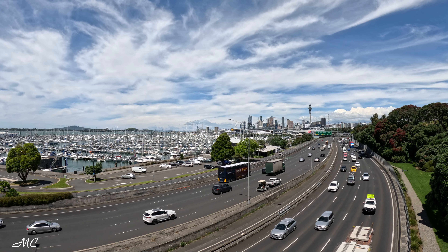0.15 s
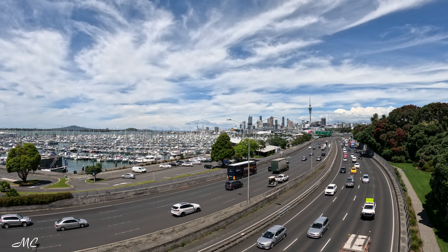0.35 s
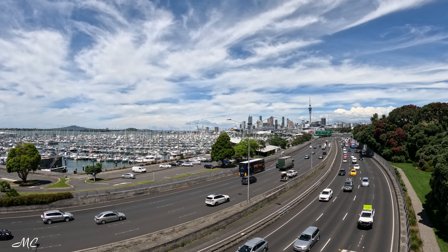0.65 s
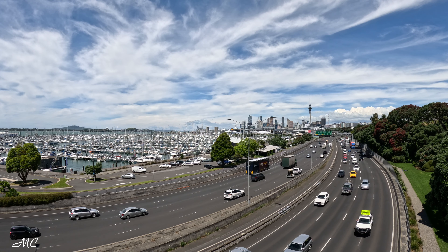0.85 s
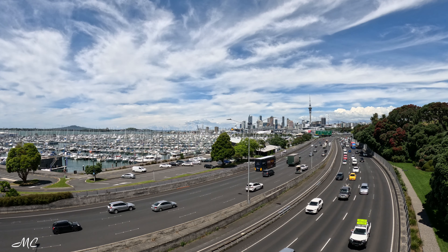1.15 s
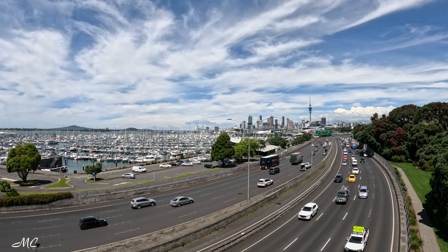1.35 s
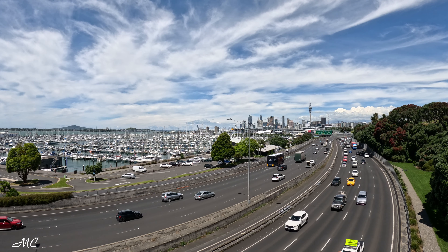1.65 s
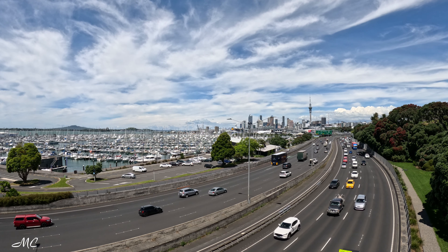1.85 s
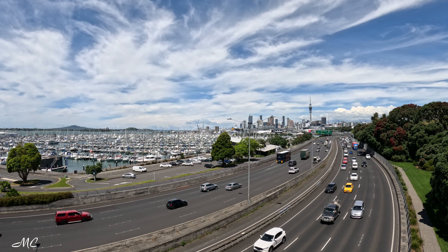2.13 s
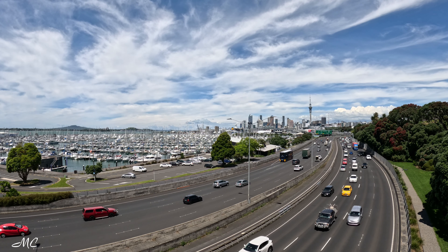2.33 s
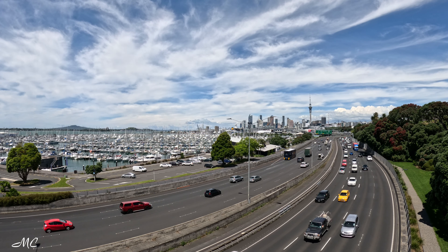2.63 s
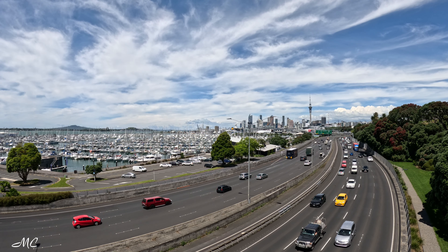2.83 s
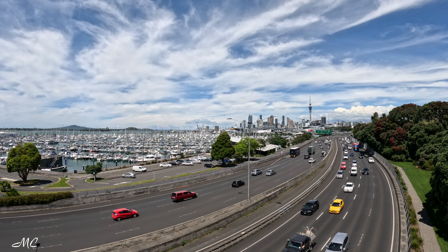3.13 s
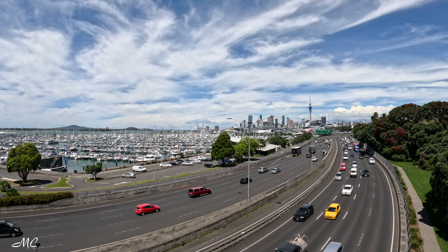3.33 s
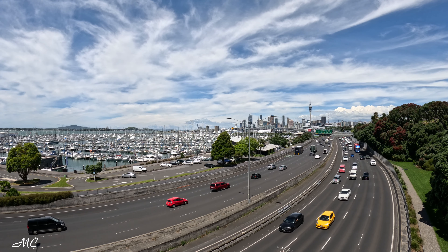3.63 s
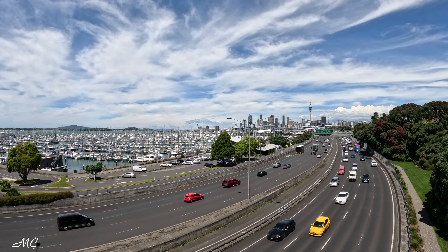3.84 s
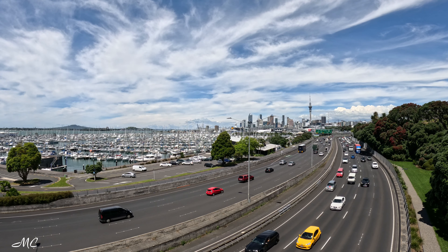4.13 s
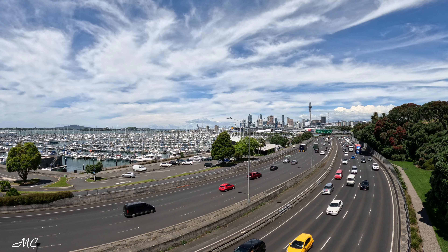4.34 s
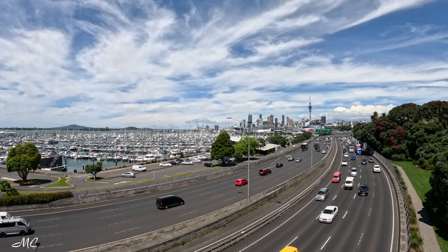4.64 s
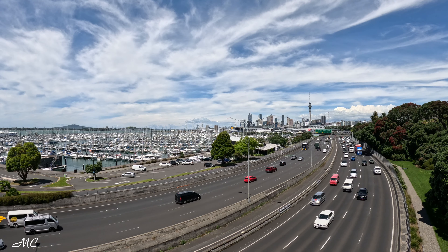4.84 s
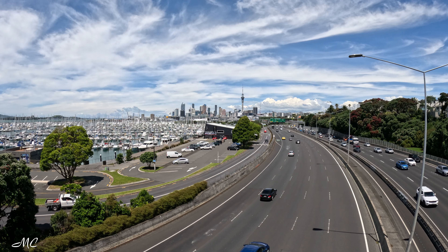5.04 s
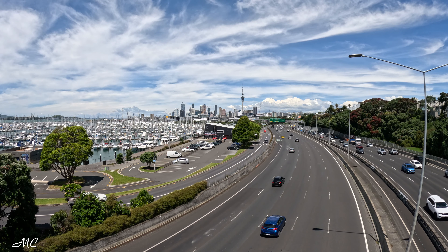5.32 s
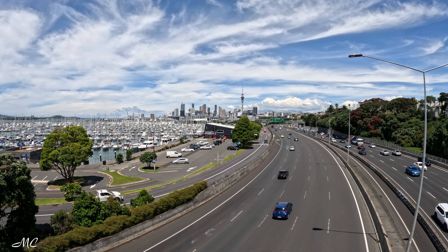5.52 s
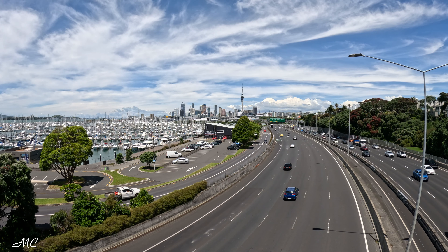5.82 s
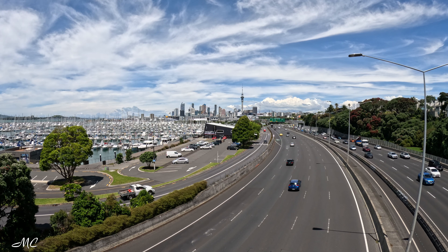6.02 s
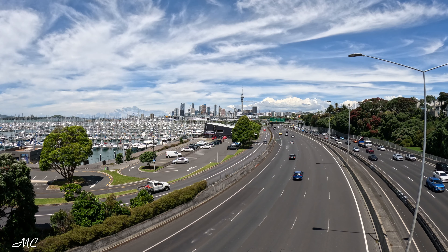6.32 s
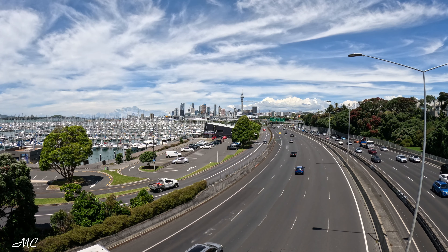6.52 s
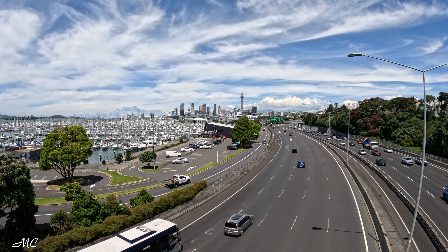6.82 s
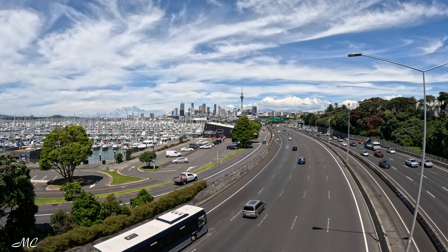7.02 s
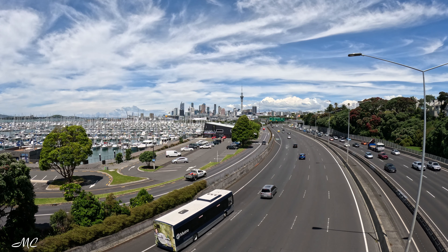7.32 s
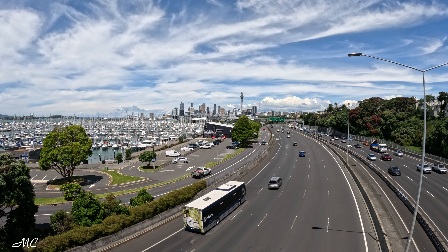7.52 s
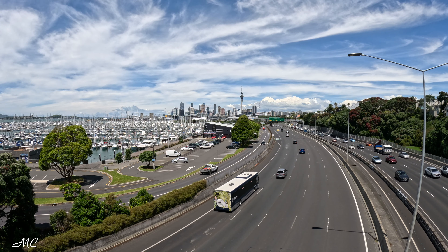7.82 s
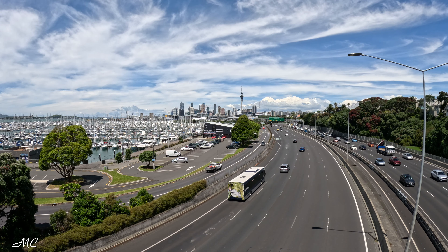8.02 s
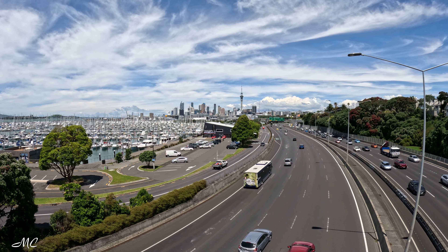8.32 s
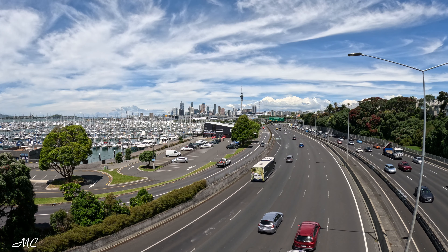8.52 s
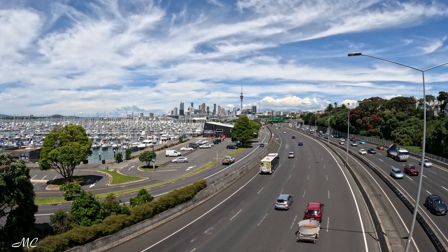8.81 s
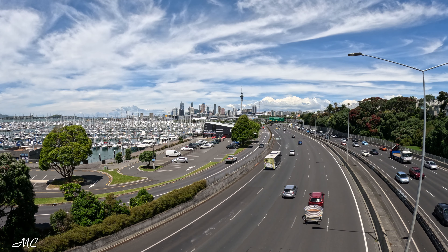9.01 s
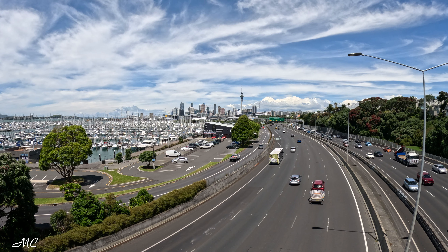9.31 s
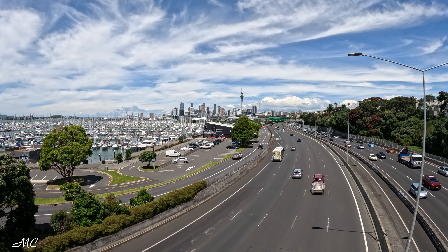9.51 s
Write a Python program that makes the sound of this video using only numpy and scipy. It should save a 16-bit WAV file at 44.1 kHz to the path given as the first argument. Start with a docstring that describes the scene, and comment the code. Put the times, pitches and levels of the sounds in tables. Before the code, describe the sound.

Heard from an overpass, cars and trucks stream along a motorway, their tyres roaring and hissing over engine drones and a deep rumble. About halfway through, the sound cuts out for an instant. Traffic returns quietly and swells as a diesel bus passes underneath with a sinking drone, faint gear whine and air hiss. Near the end, loose steel on a passing trailer clinks and rings, dropping slightly in pitch.

```python
"""Motorway from an overpass.

Heard from one side, then, after a brief silence, from the other. Tyres roar and hiss over engine
drone and low rumble. On the second side a diesel bus pulls away underneath with gear whine and air
hiss; then loose steel clinks on a passing trailer, its ring falling with the Doppler shift."""
import sys
import numpy as np
from scipy import signal
from scipy.fft import rfft, irfft
from scipy.io import wavfile
from scipy.ndimage import uniform_filter1d, map_coordinates

SR = 44100
rng = np.random.default_rng(int(sys.argv[2]) if len(sys.argv) > 2 else 0)


def transcribe(signal):
    """Save signal, clipped to [-1, 1], as a 16-bit WAV file at the path in sys.argv[1]."""
    frames = np.atleast_2d(signal).T
    limited = np.clip(frames, -1, 1)
    pcm = np.round(limited * 32767).astype(np.int16)
    wavfile.write(sys.argv[1], SR, pcm)


N = 426006
TIME = np.arange(N) / SR
CUT_S, RETURN_S = 4.904, 5.06  # silence between the sides
PASS_S = 0.43  # lane distance / vehicle speed


def traffic(wash, passes, road, fizz_re_hiss_db, patch_db, flutter_db):
    """Tyres on asphalt: distant wash plus near vehicles, made patchy by turbulent air."""
    # drone, roar, hiss, fizz: low f/Hz, high f/Hz
    bands = [(110, 380), (450, 1400), (1800, 5000), (6200, 9000)]
    hz, t, spectrum = signal.stft(rng.standard_normal(N), SR, nperseg=1024, noverlap=768)
    shape = colour(road, hz)
    falloff = np.array([1.2, 1.2, 1.3, 1.5])[:, None]  # treble dies away soonest
    power = amp(wash)[:, None] ** 2
    for s, drone_db, roar_db, hiss_db in passes:
        peak = amp([drone_db, roar_db, hiss_db, hiss_db + fizz_re_hiss_db])[:, None] ** 2
        power = power + peak * nearness(s, PASS_S, t) ** falloff
    road_power = np.array([np.sum(shape[(hz >= lo) & (hz < hi)] ** 2) / len(hz) for lo, hi in bands])
    lift_db = 10 * np.log10(power / road_power[:, None])
    centres_hz = [230, 800, 2600, 7500]
    blend = np.array([np.interp(np.log(hz + 1), np.log(centres_hz), row) for row in np.eye(len(bands))])
    patches = uniform_filter1d(rng.standard_normal(spectrum.shape), size=14, axis=0)
    patches = unit(uniform_filter1d(patches, size=16, axis=1))
    flutter = np.sqrt(hz / 5000)[:, None] * unit(uniform_filter1d(rng.standard_normal(len(t)), size=7))
    gain = amp(blend.T @ lift_db + patch_db * patches + flutter_db * flutter)
    return signal.istft(spectrum * shape[:, None] * gain, SR, nperseg=1024, noverlap=768)[1][:N]


def engine(firing_hz, db, orders, waver, fading_db, overtone_fading_db=0.5):
    """Exhaust orders on an unsteady firing rate; each fades as road reflections shift."""
    turns = np.cumsum(firing_hz * (1 + waver * wander(14))) / SR
    note = np.zeros(N)
    for order, order_db in orders:
        depth_db = fading_db if order == 1 else overtone_fading_db
        gain = amp(order_db + depth_db * wander(9.6))
        note += gain * np.sin(2 * np.pi * (order * turns + rng.random()))
    return np.sqrt(2) * note * amp(db)


def passing_engines(rows, fade_s=0.1):
    """Each engine emerges, drones on a gliding pitch and vanishes."""
    # firing order, level/dB
    exhaust = [(1, -7), (2, -23), (3, -37.5)]
    out = np.zeros(N)
    for start_s, end_s, first_hz, last_hz, first_db, last_db in rows:
        hz, db = curves([(start_s, first_hz, first_db), (end_s, last_hz, last_db)])
        gate = np.clip(.5 + np.minimum(TIME - start_s, end_s - TIME) / fade_s, 0, 1)
        out += gate * engine(hz, db, exhaust, waver=0.0048, fading_db=2.0)
    return out


def bus_diesel():
    """Exhaust drone of the bus, surging in level as its pitch sinks."""
    # t/s, firing rate/Hz, level/dB
    run = [(5.3, 90.3, -46.5), (6.05, 88, -34), (6.34, 86.6, -25.5), (6.51, 86.27, -34.5),
           (7.02, 83.94, -23), (7.47, 81.3, -38.5), (7.76, 81.1, -22), (7.95, 80.3, -21),
           (9.17, 80.25, -26.5), (9.29, 80.04, -20), (9.54, 81.2, -30.5), (9.66, 79.8, -43)]
    # firing order, level/dB
    orders = [(1, 0.5), (2, -17.5), (3, -18), (3.5, -21.5)]
    return engine(*curves(run), orders, waver=0.0068, fading_db=1.5)


def trailer(nearest_s=8.24, near_s=0.38, shift=0.04, listed_pitch_s=9.06):
    """Loose steel rings at each blow until it falls back and is damped; Doppler bends its pitch."""
    # f/Hz at listed_pitch_s, level/dB, t60/s, group (0 main ring, 1 second, 2 ping, 3 jangle, 4 chink)
    modes = [(3050, -6, .2, 3), (3605, 0, .18, 4), (3765, 3, .14, 3), (4175, -5, .09, 3),
             (5385, -13, .07, 0), (5453, -2.5, .58, 0), (5530, -10, .07, 0), (5990, -21, .2, 2),
             (7125, -1.5, .075, 1), (7100, -21, .6, 1), (9170, 1, .075, 2), (9165, -22, .5, 2),
             (9200, -10, .08, 3), (9110, -19, .3, 4), (11570, -10.5, .28, 3), (11960, -11.5, .26, 3),
             (12430, -29, .3, 2)]
    # blows: t/s, strength/dB, free ringing/s, contact kind
    clinks = [(7.63, -53, .12, "tap"), (7.86, -54, .1, "tap"), (7.992, -51, .1, "tap"),
              (8.129, -48, .03, "strike"), (8.146, -39, .05, "chink"), (8.166, -44, .06, "tap"),
              (8.183, -56, .02, "jangle"), (8.243, -44.5, .08, "tap"), (8.358, -50, .02, "edge"),
              (8.370, -39, .02, "edge"), (8.381, -27.5, .17, "edge"), (8.386, -32, .022, "strike"),
              (8.401, -39, .02, "knock"), (8.419, -44, .1, "jangle"), (8.426, -37, .005, "tap"),
              (8.451, -30, .014, "tap"), (8.480, -42, .03, "tap"), (8.531, -37, .012, "tap"),
              (8.563, -42, .08, "tap"), (8.598, -42, .04, "tap"), (8.623, -36, .02, "knock"),
              (8.735, -43, .005, "knock"), (8.749, -38.5, .014, "edge"), (8.757, -52, .008, "strike"),
              (8.760, -45, .04, "jangle"), (9.083, -28.5, .17, "strike"), (9.228, -47, .17, "tap"),
              (9.304, -43, .01, "knock"), (9.323, -52, .03, "edge")]
    # per kind: gain/dB of groups 0-4, knock gain/dB, beat dip/fraction
    contacts = {"tap": (3.5, -28, -30, -30, -40, -30, .3), "strike": (3.5, -22, -9, -32, -30, -6, .8),
                "edge": (-22, 3, -24, -14, -30, -18, .3), "knock": (-22, -16, -30, -23, -30, 2, 0),
                "jangle": (-14, -14, -24, 0, -20, -20, .3), "chink": (-30, -30, -30, -22, 0, -30, 0)}
    rise_s, damp_s, beat_hz = 0.0006, 0.014, 12.7
    t, out = np.arange(SR // 3) / SR, np.zeros(N)
    attack = 1 - np.exp(-t / rise_s)
    beat_rad = np.pi * beat_hz * t
    blows, hits = [], []
    for s, db, free_s, kind in clinks:
        *group_db, knock_db, dip = contacts[kind]
        beat = np.hypot(np.cos(beat_rad), (1 - dip) * np.sin(beat_rad))
        damping = np.exp(-np.maximum(t - free_s, 0) / damp_s)
        blows.append((s, amp(db) * attack * beat * damping, group_db))
        hits.append((s, db + knock_db))
    path = nearest_s, near_s, shift
    clock_s = np.cumsum(doppler(*path) / doppler(*path, listed_pitch_s)) / SR
    for hz, db, t60_s, group in modes:
        ring, energy = amp(db - 60 * t / t60_s), np.zeros(N)
        for s, blow, group_db in blows:
            add(energy, s, (amp(group_db[group]) * blow * ring) ** 2)
        # the part swings, so its tone flutters, high modes most
        smear_rad = 1.1 * (hz / 8000) ** 2 * wander(90)
        flutter = amp(0.9 * wander(110))
        out += np.sqrt(energy) * flutter * np.sin(2 * np.pi * hz * clock_s + smear_rad)
    return out + knocks(hits)


def knocks(hits, gain_db=-3, decay_s=0.0085):
    """Dry noise bursts where the loose steel hits."""
    # f/Hz, level/dB
    spectrum = [(1500, -20), (2800, -9), (3100, 5), (3400, -5), (3800, 6), (4000, 6), (4230, 7), (4700, 3),
                (5500, 7), (6050, 3), (6500, -6), (7150, 6), (7600, -7), (8200, 0), (8900, -11), (9900, -5),
                (10900, -9), (12000, -6), (14000, -22.5)]
    t, envelope = np.arange(SR // 10) / SR, np.zeros(N)
    for s, db in hits:
        add(envelope, s, amp(db + gain_db) * np.exp(-t / decay_s))
    return envelope * noise(spectrum)


def tread():
    """Treads of the closest cars sing in a broad mid-range peak."""
    # f/Hz, level/dB
    spectrum = [(500, -27.5), (900, -1), (1100, 4), (1300, -4), (1700, -14), (4000, -54)]
    # nearest t/s, level/dB, pitch factor from speed
    cars = [(0.15, -42, 1.39), (8.2, -32.5, 1.04)]
    return sum(noise(spectrum, pitch) * amp(db) * nearness(s, PASS_S) ** 0.74 for s, db, pitch in cars)


def bus_whine(mesh_hz=2443, width_hz=150, level_db=-58.5, near_s=0.8):
    """Gear whine sliding down as the bus passes; uneven tooth contact widens each line."""
    # mesh order, level/dB
    orders = [(1, 0.5), (1.53, -7), (2, -13)]
    phase = 2 * np.pi * np.cumsum(mesh_hz * doppler(7.2, near_s, shift=0.06)) / SR
    mesh = sum(amp(db) * (wander(width_hz) * np.cos(k * phase) + wander(width_hz) * np.sin(k * phase))
               for k, db in orders)
    return amp(level_db) * nearness(7.16, near_s) ** 1.3 * mesh


def bus_air(flutter_db=2.0):
    """Swells of hiss from the bus's air intake."""
    # peak t/s, width/s, level/dB
    swells = [(6.45, 0.2, -75), (7.05, 0.55, -64), (7.46, 0.2, -60.5), (7.7, 0.65, -60.5),
              (7.93, 0.043, -55)]
    # f/Hz, level/dB
    spectrum = [(3000, -16), (6800, 9), (9000, -3.5), (9800, 2.5), (11200, -5), (12200, -1), (14800, -18)]
    envelope = sum(amp(db) * nearness(s, width_s) ** 2 for s, width_s, db in swells)
    return noise(spectrum) * envelope * amp(flutter_db * wander(46))


def rattles():
    """Loose parts tick faintly in the traffic."""
    # t/s, level/dB, centre f/Hz, decay/s
    ticks = [(1.335, -65, 7900, .05), (1.44, -66.5, 7900, .035), (1.875, -61, 7000, .03),
             (2.315, -67, 7200, .03), (2.565, -62, 8400, .012), (2.661, -59.5, 8200, .01),
             (2.712, -55.5, 5600, .014)]
    # f/centre, level/dB
    spectrum = [(.45, -25), (.7, -5), (1, 0), (1.15, -6.5), (1.6, -24), (2, -45)]
    t, out = np.arange(SR // 5) / SR, np.zeros(N)
    for s, db, centre_hz, decay_s in ticks:
        add(out, s, amp(db) * np.exp(-t / decay_s) * noise(spectrum, centre_hz, size=len(t)))
    return out


def sizzle(flutter_db=2.0):
    """Thin, airy top on the tyre hiss of some near cars."""
    # f/Hz, level/dB
    spectrum = [(5000, -30), (8300, -5.5), (10200, -5), (11800, 1), (12500, -1), (13300, -9),
                (14500, -27.5)]
    # nearest t/s, level/dB, pitch factor from speed
    cars = [(0.5, -82, 1.0), (2.75, -81, 1.0), (9.2, -73.5, 0.8)]
    hiss = sum(noise(spectrum, pitch) * amp(db) * nearness(s, PASS_S) for s, db, pitch in cars)
    return hiss * amp(flutter_db * wander(25))


def rumble(level_db):
    """Deep noise of heavy vehicles and moving air."""
    # f/Hz, level/dB
    spectrum = [(4, -5.5), (12, -1.5), (30, 10), (45, 9.5), (60, 14), (85, 7), (105, 7.5), (140, -9),
                (300, -75)]
    return noise(spectrum) * amp(level_db - 0.1 * wander(12))


def roadside(x, wet_db=-11, t60_s=0.19, echoes_per_s=2000):
    """Adds scattered reflections from road, barriers and bridge."""
    t = np.arange(SR // 3) / SR
    taps = rng.standard_normal(len(t)) * (rng.random(len(t)) < echoes_per_s / SR)
    taps *= amp(-60 * t / t60_s) * (t > .004)
    return x + amp(wet_db) * signal.fftconvolve(x, taps / np.linalg.norm(taps))[:N]


def nearness(s, near_s, t=TIME):
    """Inverse-square power of a passing source, 1 at time s."""
    return 1 / (1 + ((t - s) / near_s) ** 2)


def doppler(s, near_s, shift, t=TIME):
    """Pitch factor of a source passing at time s: from 1 + shift to 1 - shift."""
    return 1 - shift * (t - s) / np.hypot(t - s, near_s)


def amp(db):
    """dB to gain."""
    return np.exp(np.asarray(db) * np.log(10) / 20)


def unit(x):
    """Scales to rms 1."""
    return x / np.sqrt(np.mean(x ** 2) + 1e-20)


def colour(points, hz):
    """Gain of a spectrum interpolated over log frequency."""
    f, db = np.transpose(points)
    return amp(np.interp(np.log(hz + 1), np.log(f + 1), db))


def curves(rows):
    """Columns after the first (t/s), interpolated per sample."""
    s, *columns = np.transpose(rows)
    return [np.interp(TIME, s, c) for c in columns]


def noise(points, pitch=1, size=N):
    """Coloured noise at rms 1; pitch scales the spectrum's frequencies."""
    shape = colour([(f * pitch, db) for f, db in points], np.fft.rfftfreq(size, 1 / SR))
    return unit(irfft(rfft(rng.standard_normal(size)) * shape, size))


def wander(rate_hz):
    """Smooth random curve at rms 1."""
    knots, t = rng.standard_normal(4096), TIME[::32]
    return unit(np.interp(TIME, t, map_coordinates(knots, [t * rate_hz], order=3, mode="wrap")))


def add(mix, s, sound):
    """Mixes a sound in at time s."""
    part = mix[round(s * SR):][:len(sound)]
    part += sound[:len(part)]


def scene(swell_db_per_s=7.5, swell_end_s=7.754):
    """Side A of the overpass, then side B, whose traffic swells up to its listed levels."""
    # road spectrum: f/Hz, level/dB
    road_a = [(60, -30), (100, 7), (140, -1.5), (200, -1), (320, -6.5), (450, -13.5), (570, -7.5),
              (720, -7), (1250, -20.5), (1650, -27.5), (2450, -38), (3400, -41), (5900, -53), (8400, -58),
              (12500, -76), (13800, -87), (14800, -104)]
    road_b = [(60, -22), (115, 2), (165, -5.5), (230, -4.5), (340, -10), (450, -14), (1000, -18),
              (1250, -21), (1600, -27), (3700, -34), (5000, -42), (7500, -47.5), (9000, -58), (10000, -56),
              (14800, -81)]
    # distant traffic: drone/dB, roar/dB, hiss/dB, fizz/dB
    wash_a = (-30.5, -32, -49.5, -73.5)
    wash_b = (-26.5, -27.5, -45.5, -65.5)
    # near vehicles: nearest t/s, drone/dB, roar/dB, hiss/dB
    passes_a = [(0.1, -28, -30.5, -42.5), (0.8, -24, -38, -45.5), (1.95, -29, -29.5, -51),
                (2.7, -33.5, -32.5, -52), (3.4, -30, -30, -57), (4.751, -31.5, -33, -49)]
    passes_b = [(5.65, -41, -42, -52), (6.7, -29, -28, -54), (7.5, -34, -55, -46.5),
                (8.05, -50, -29.5, -44.5), (8.5, -38, -42.5, -49), (9.4, -33, -31, -66)]
    # start t/s, end t/s, first and last firing rate/Hz, first and last level/dB
    engines = [(0.08, 0.85, 173, 168.5, -18, -19.5), (0.88, 1.55, 167, 165, -27, -30),
               (0.0, 4.8, 65, 66.6, -19.5, -21.5), (1.93, 2.66, 85, 84, -21, -20),
               (2.4, 3.35, 131, 126, -24, -25), (3.62, 3.98, 66, 71, -16, -11.5),
               (4.0, 4.95, 50, 48.5, -15.5, -18.5), (5.35, 6.4, 120, 119, -41, -37),
               (8.2, 9.3, 121, 120, -21, -30)]
    side_a = traffic(wash_a, passes_a, road_a, fizz_re_hiss_db=-22.5, patch_db=0.63, flutter_db=0.5)
    side_a += rumble(level_db=-23.5)
    side_a += passing_engines([row for row in engines if row[0] < CUT_S])
    side_b = traffic(wash_b, passes_b, road_b, fizz_re_hiss_db=-18, patch_db=0.66, flutter_db=0.43)
    side_b += rumble(level_db=-26.5)
    side_b *= amp(swell_db_per_s * np.minimum(TIME - swell_end_s, 0))
    side_b += passing_engines([row for row in engines if row[0] > CUT_S])
    side_b += bus_diesel() + bus_whine() + bus_air()
    road = np.where(TIME < (CUT_S + RETURN_S) / 2, side_a, side_b)
    return (road + tread() + sizzle() + roadside(trailer() + rattles()))[None]


def record(dry, fade_out_s=0.003, fade_in_s=0.16, floor_db=-58, cutoff_hz=14950):
    """Brief silence between the sides, then a low-pass."""
    fade_out = np.exp(-(np.maximum(TIME - CUT_S, 0) / fade_out_s) ** 2 / 2)
    fade_in = np.clip((TIME - RETURN_S) / fade_in_s, 0, 1) ** 1.3
    faded = dry * np.maximum(fade_out + fade_in, amp(floor_db))
    lowpass = signal.firwin(255, cutoff_hz, window=("kaiser", 9), fs=SR)
    return signal.oaconvolve(faded, lowpass[None], "same")


dry = scene()
out = record(dry)
transcribe(out)
```